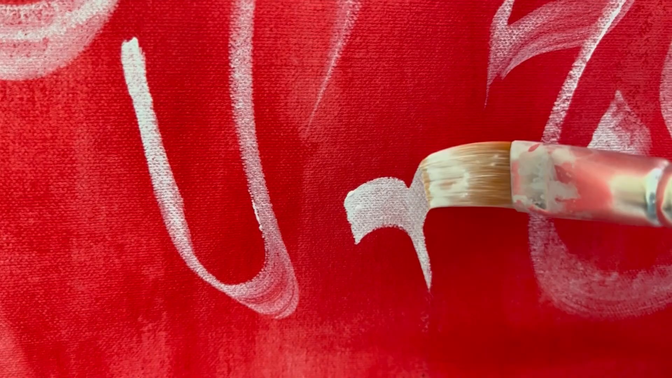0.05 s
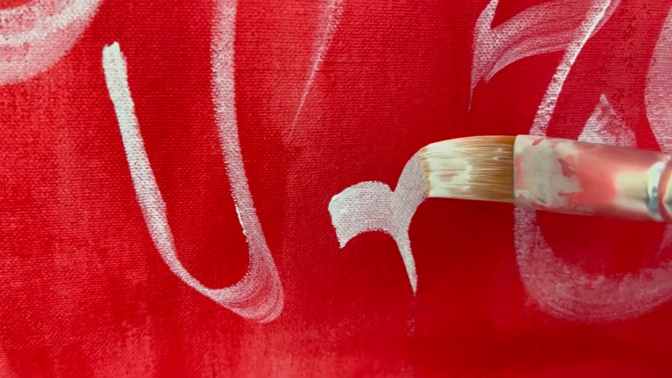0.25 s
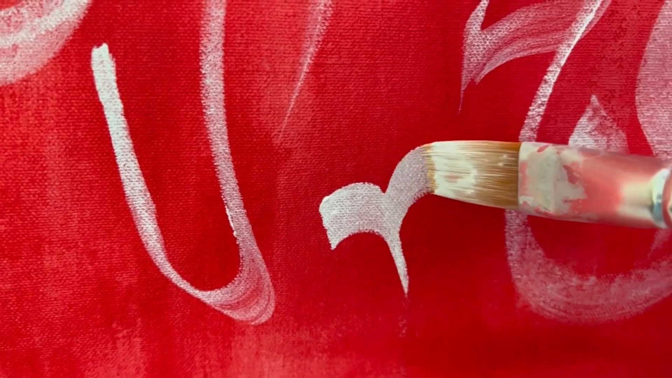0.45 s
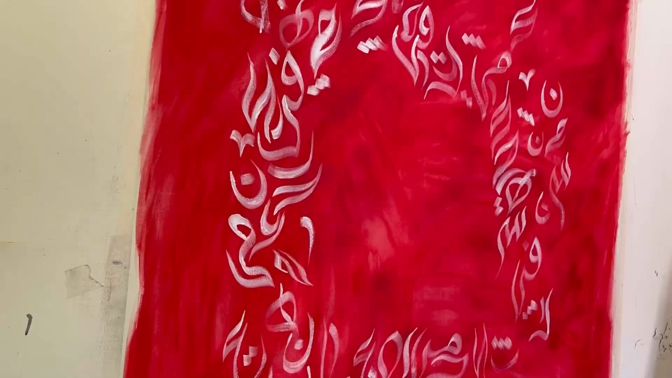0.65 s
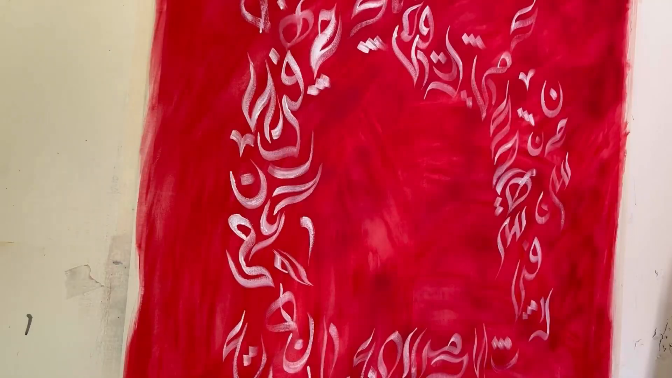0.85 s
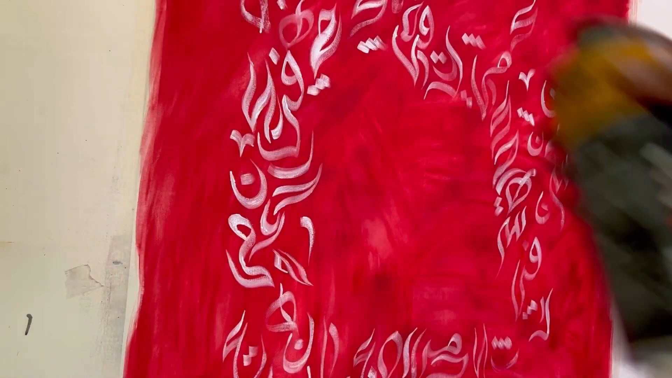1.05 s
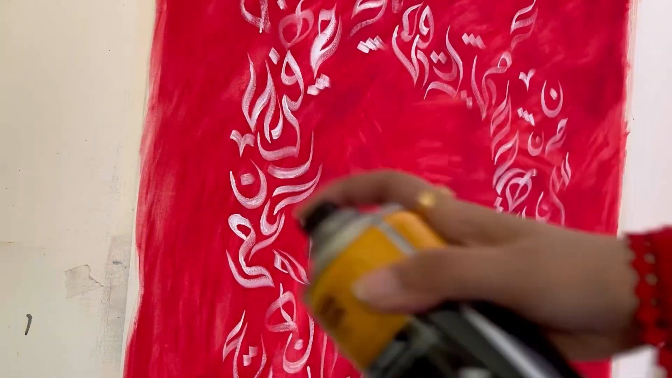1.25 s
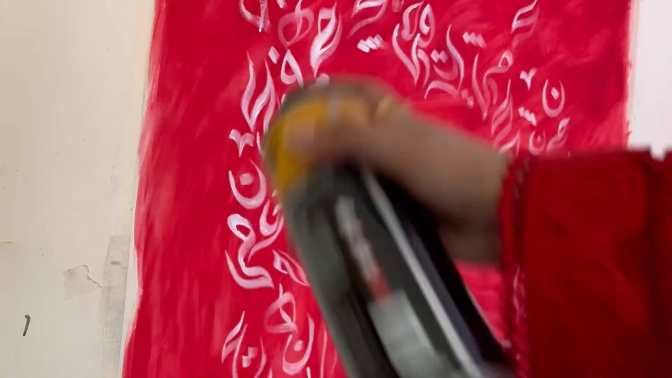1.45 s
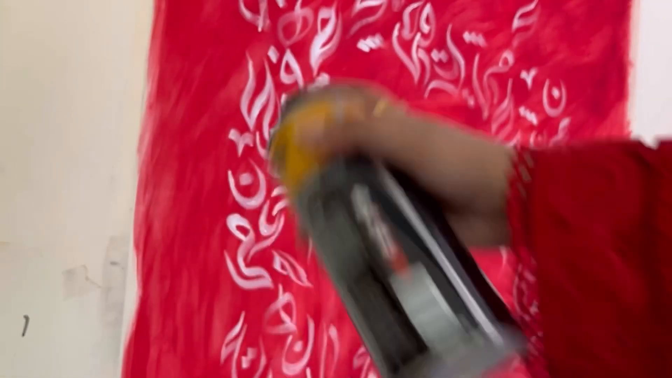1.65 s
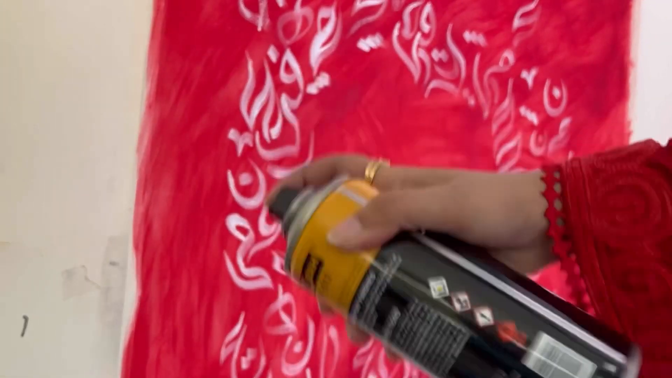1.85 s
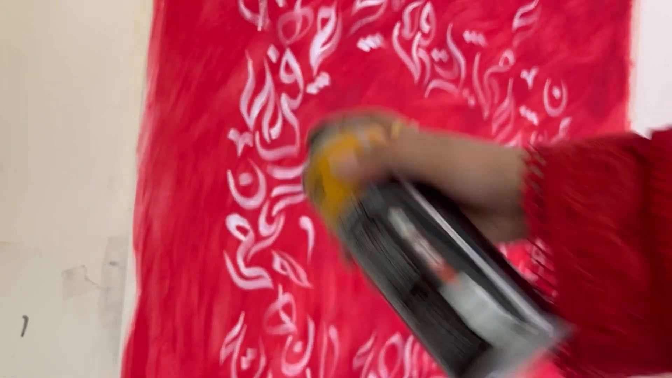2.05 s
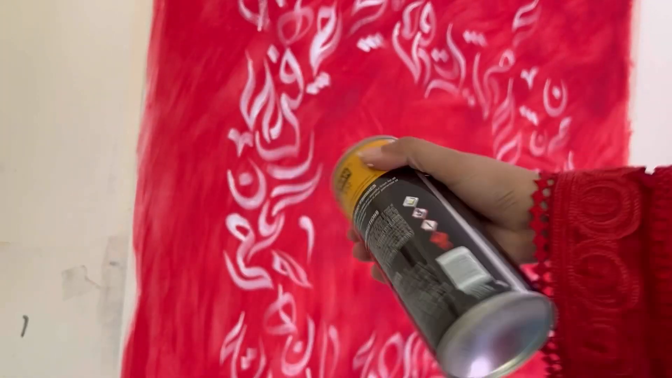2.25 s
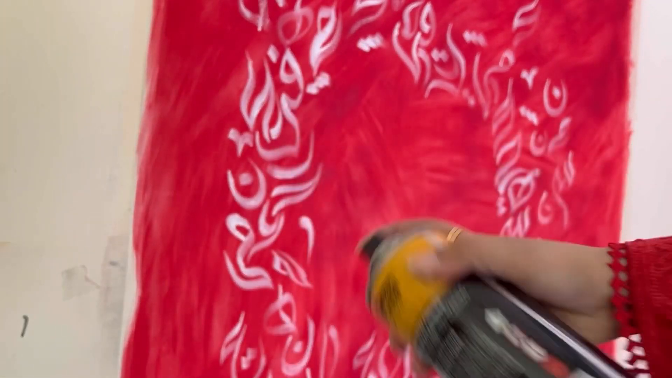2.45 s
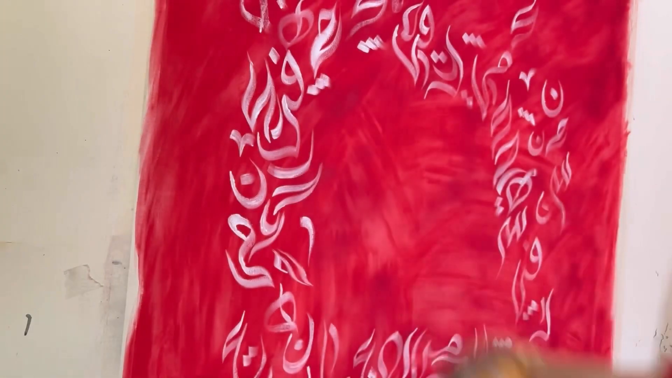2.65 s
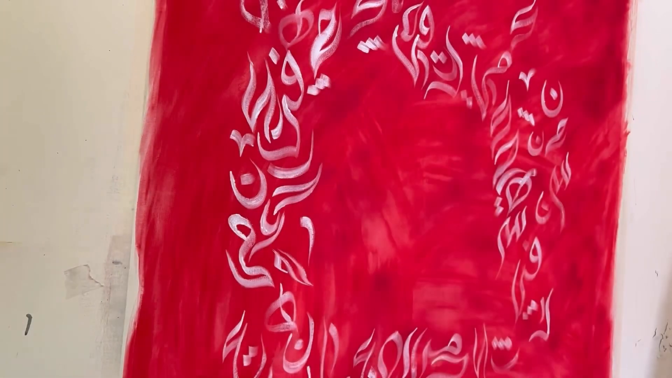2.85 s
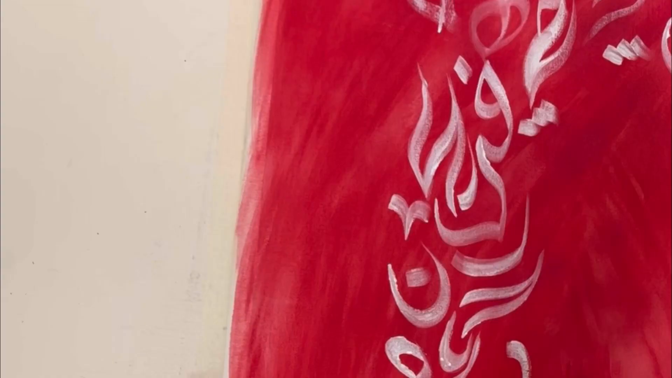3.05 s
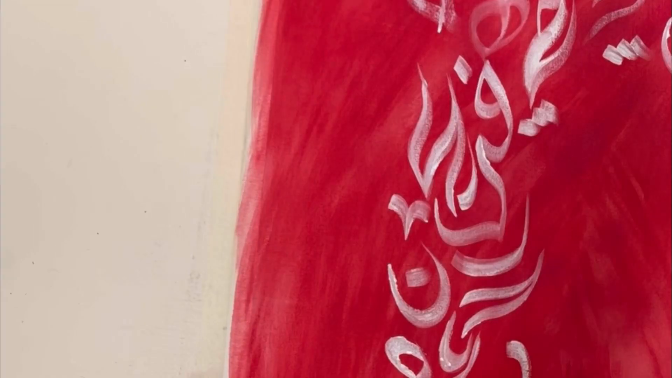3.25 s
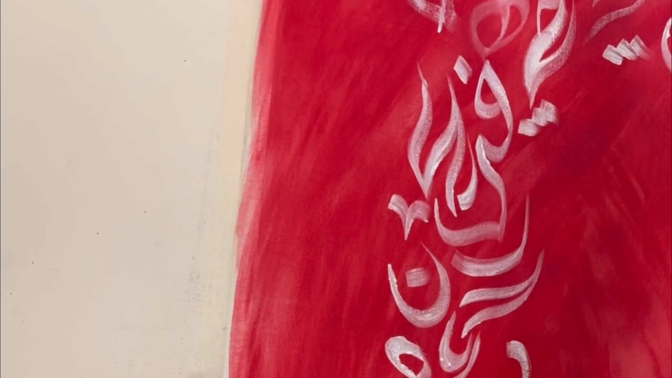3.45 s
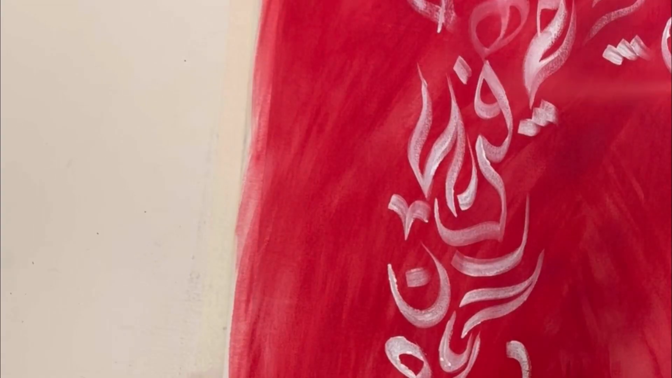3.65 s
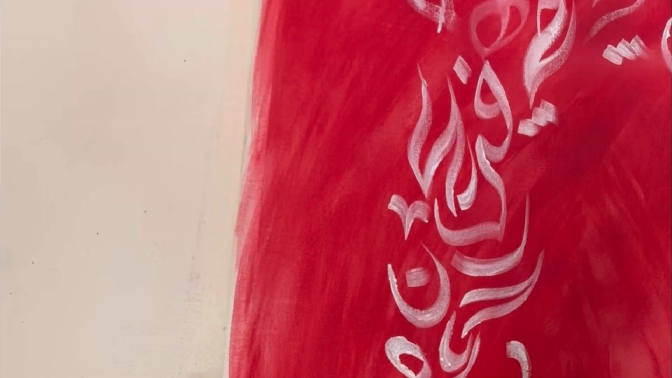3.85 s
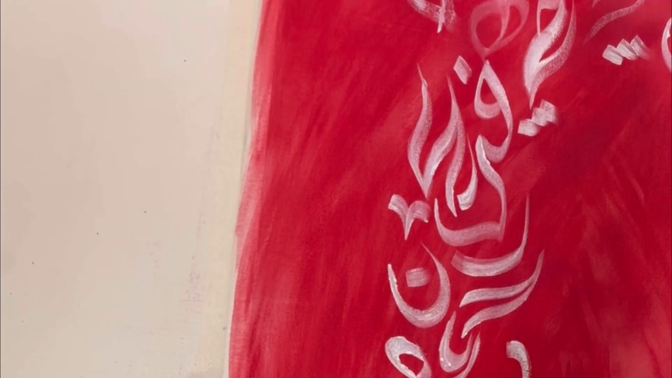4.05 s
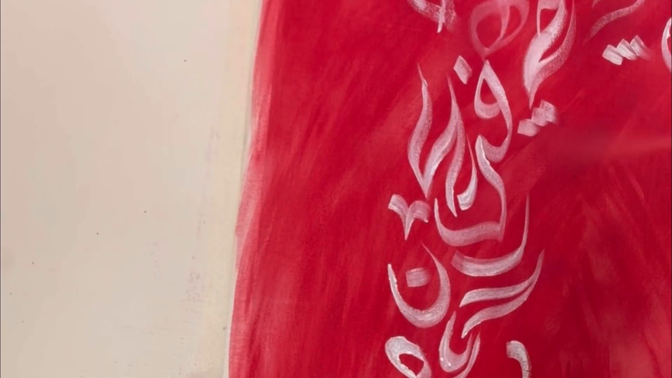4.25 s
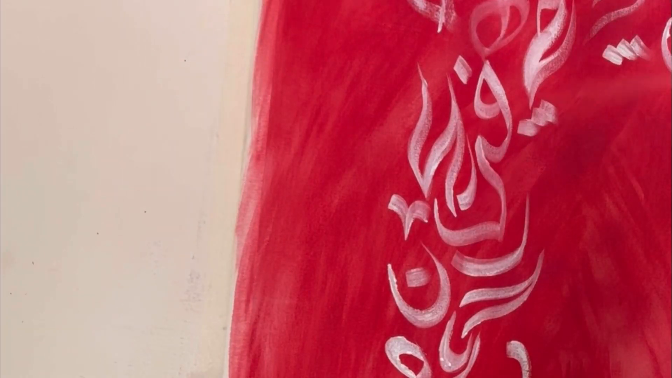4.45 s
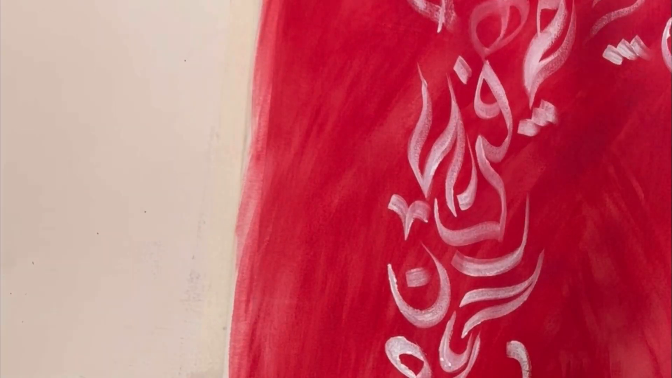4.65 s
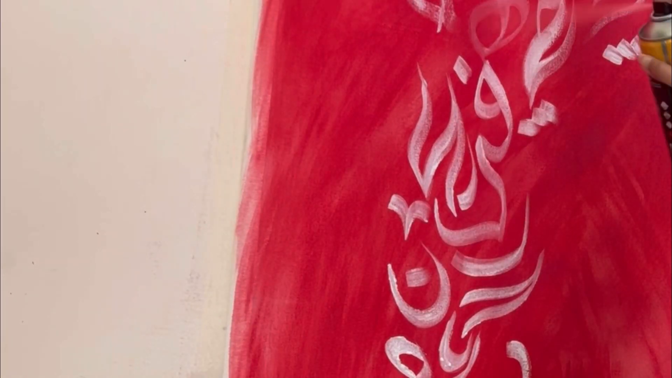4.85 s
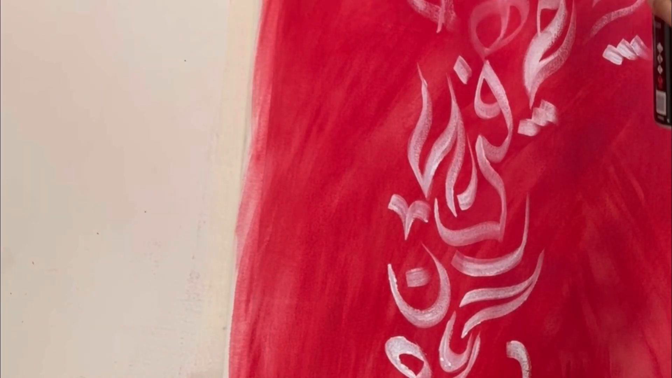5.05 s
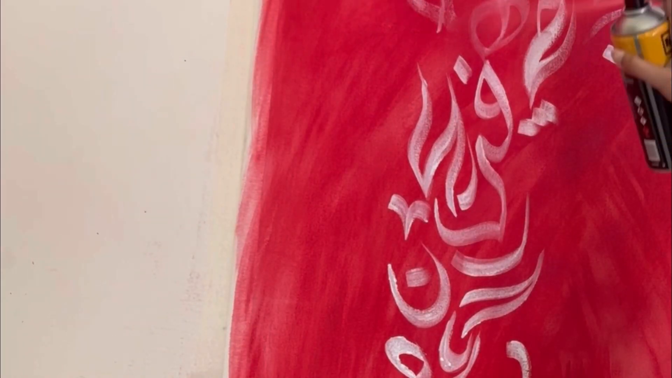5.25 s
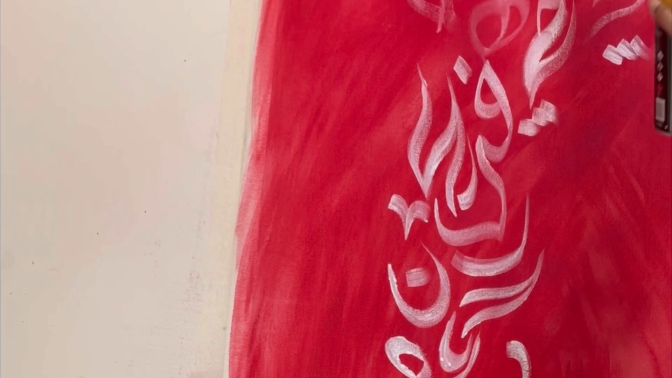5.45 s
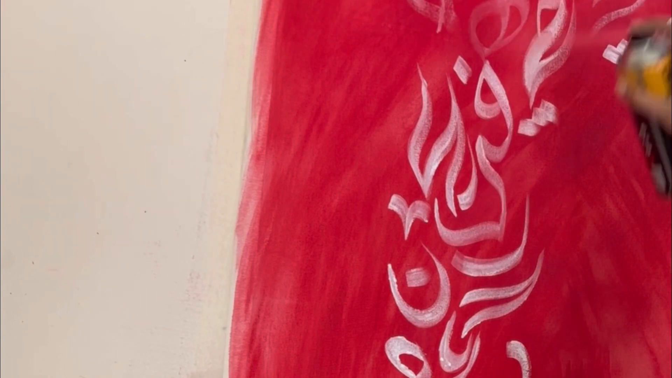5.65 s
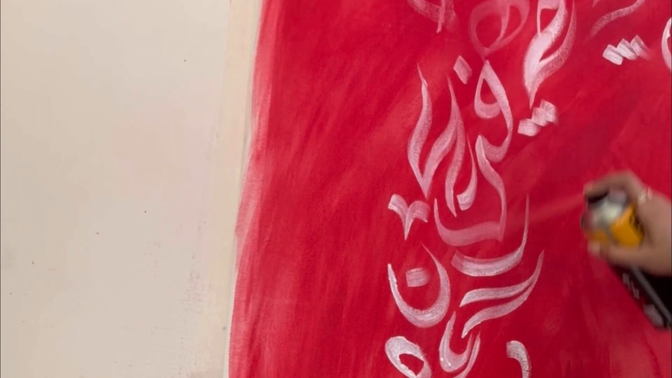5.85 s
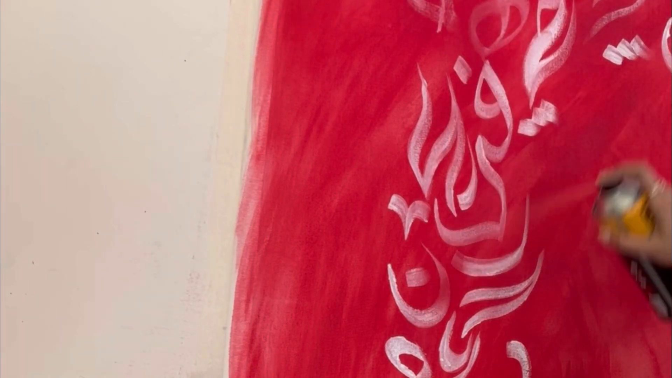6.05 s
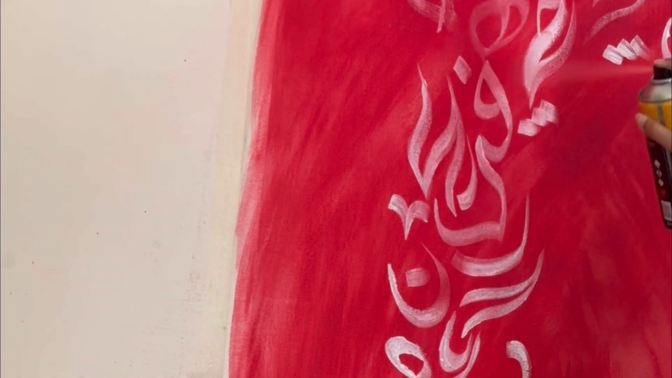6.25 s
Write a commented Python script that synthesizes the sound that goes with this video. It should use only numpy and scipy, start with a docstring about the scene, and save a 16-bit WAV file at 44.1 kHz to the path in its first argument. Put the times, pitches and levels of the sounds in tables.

```python
"""Shaking and spraying a paint can

After a quiet opening with a low rumble and a thin falling chirp, a spray can is shaken in a bare,
live room. Each impact of the steel ball excites the modes of the wall, damped by the paint inside.
Then a turbulent jet hisses steadily from the nozzle while the can sweeps over a canvas."""
import sys
import numpy as np
from scipy import signal
from scipy.fft import rfft, irfft, next_fast_len
from scipy.io import wavfile
from scipy.ndimage import uniform_filter1d

SR = 44100
rng = np.random.default_rng(int(sys.argv[2]) if len(sys.argv) > 2 else 0)


def output_pcm(signal):
    """Save a mono or channel-first signal as 16-bit PCM at the path in sys.argv[1].

    Samples are clipped to [-1, 1] before scaling.
    """
    pcm = np.clip(np.atleast_2d(signal).T, -1, 1) * 32767
    wavfile.write(sys.argv[1], SR, np.round(pcm).astype(np.int16))


N = 278271
FFT_SIZE = next_fast_len(N + SR)
TIME = np.arange(N) / SR

# ball impacts (time [s], thud, knock, lower wall, upper wall, tick, ping [each dB rms over 4 ms],
# lower wall pitch [Hz], upper wall pitch [Hz], contact time [ms])
IMPACTS = [(0.62, -81, -79, -74, -68, -67, -81, 2980, 4350, 1.1),
           (0.6324, -79, -61, -47.5, -52, -49.5, -61.5, 2870, 4270, 0.69),
           (1.1953, -72, -45.5, -39, -36.5, -54, -65.5, 3300, 3980, 0.57),
           (1.279, -67, -62, -50, -46, -48, -64, 3400, 4680, 0.75),
           (1.3039, -65, -61, -40, -35.0, -39, -40, 3450, 4280, 0.22),
           (1.3148, -41, -36, -23.5, -20.5, -26, -24, 3410, 4580, 1.26),
           (1.3318, -63, -38, -42, -44, -48, -41, 3480, 4280, 1.3),
           (1.3423, -56, -39, -35, -32.5, -49, -42, 3450, 4150, 1.4),
           (1.383, -56, -43, -43, -50, -54, -47, 3360, 4390, 1.1),
           (1.4106, -56, -44, -38, -55, -51.5, -53.0, 2840, 4530, 1.06),
           (1.4888, -72, -45, -43.5, -56, -58, -60, 3360, 4260, 1.6),
           (1.5969, -66, -53, -28, -26.5, -40.5, -43, 3370, 4500, 0.75),
           (1.6087, -35.5, -28.5, -13, -10, -22.5, -26, 3400, 4416, 0.53),
           (1.6213, -43, -53, -25, -33, -29, -36, 3500, 4450, 0.99),
           (1.6239, -55, -36, -16, -17.5, -39, -42, 3120, 4470, 0.34),
           (1.6354, -49, -37, -33, -42, -39, -40, 3330, 4450, 0.44),
           (1.642, -44, -40, -27, -39, -47, -47.0, 3400, 4340, 1.24),
           (1.6478, -28.5, -26.0, -12, -21, -33.5, -37, 3500, 4500, 0.99),
           (1.6639, -43, -48, -29, -45, -51.0, -45.5, 3400, 4270, 0.76),
           (1.767, -55, -40, -44.5, -40, -49.5, -47, 3400, 4370, 0.61),
           (1.7793, -44.5, -28, -26, -32, -35.5, -34, 3280, 4370, 0.82),
           (1.7852, -54, -52, -45, -25, -22.5, -17.5, 3340, 4350, 0.22),
           (1.8118, -40.5, -39, -19.5, -22.5, -26.5, -34.5, 3570, 4280, 0.34),
           (1.818, -60, -51, -37.5, -25, -48, -45.5, 3530, 4470, 1.1),
           (1.825, -38.5, -43, -13, -16.5, -29.5, -33, 3415, 3930, 0.23),
           (1.8767, -44, -27, -20, -41, -33, -36, 3140, 4070, 0.27),
           (1.897, -42, -26.5, -28, -20, -32, -37, 3340, 4350, 1.67),
           (1.9057, -49, -29.5, -18.5, -20, -32, -44, 3500, 4200, 0.52),
           (1.9495, -42.5, -30.5, -32, -20, -31.5, -33, 3500, 4330, 1.1),
           (1.9528, -39.5, -31, -20, -31, -34, -34, 3340, 4200, 0.7),
           (1.9844, -56, -51, -24, -36, -48, -53, 3400, 4170, 0.83),
           (2.0358, -39, -27.5, -22, -31, -34, -42, 3440, 3870, 0.54),
           (2.0389, -45, -42, -26, -44, -39, -41, 3320, 4340, 0.4),
           (2.073, -40.5, -27.5, -23.5, -31, -36.5, -44.5, 3670, 3760, 1.26),
           (2.094, -63, -59, -44, -31, -36, -38, 3550, 4500, 0.54),
           (2.1089, -43.5, -53, -36, -30, -24, -24, 3550, 4470, 0.52),
           (2.14, -70, -55.5, -33, -28.5, -50, -49, 3660, 4250, 0.31),
           (2.1516, -57, -41, -17.5, -16.5, -33.5, -38, 3380, 4080, 0.16),
           (2.1633, -63, -46, -34, -35, -48, -47, 3550, 4400, 0.27),
           (2.1762, -55, -52, -39, -46, -53, -51, 3400, 4300, 0.25),
           (2.1882, -43.5, -28, -17.5, -32, -29, -37, 3260, 4160, 0.15),
           (2.199, -58.5, -40, -42, -44, -44, -48.5, 3200, 4210, 0.31),
           (2.2311, -38.5, -45, -23.5, -24, -25, -36, 3630, 4390, 2.2),
           (2.235, -41, -26, -28, -20, -30, -31, 3780, 4230, 1.44),
           (2.251, -36.5, -25, -27.5, -28, -31.5, -42, 3070, 4530, 0.7),
           (2.271, -38.5, -47, -23.5, -25, -48.5, -42.5, 3630, 4370, 0.32),
           (2.3077, -39.5, -31, -23, -29, -41, -38, 3300, 4600, 0.82),
           (2.344, -54.5, -44.5, -44.5, -38, -41, -43.5, 3580, 4300, 0.73),
           (2.3558, -36.5, -28.5, -18, -21.5, -22.5, -25, 3570, 4500, 1),
           (2.375, -41.5, -34.5, -23.5, -26.5, -44.5, -48, 3560, 4120, 0.38),
           (2.4025, -54.5, -33, -30, -26.5, -31.5, -31, 3260, 4480, 1.4),
           (2.4396, -44, -27.5, -24, -26.5, -34, -40, 3150, 4300, 1.3),
           (2.492, -54.5, -46, -41, -41, -51.5, -54, 3380, 4150, 0.49),
           (2.5032, -43, -29.0, -22, -24.5, -29.5, -31.5, 3640, 4300, 0.64),
           (2.5088, -46, -34, -30, -24, -48, -46, 3450, 4450, 0.37),
           (2.5318, -43, -36, -32, -31, -32, -33, 3270, 4700, 1.96),
           (2.541, -47, -30, -29, -25.5, -47, -55, 3300, 4640, 0.41),
           (2.5984, -55.5, -52, -36, -43, -58.5, -44.5, 3440, 4480, 1),
           (2.6104, -44, -32.5, -18, -24, -34, -31, 3310, 4520, 1.2),
           (2.6199, -44.5, -47, -36.5, -42, -35.5, -40.5, 3360, 4330, 1.15),
           (2.63, -39, -29, -35.5, -27, -19, -18, 3300, 4550, 2.4),
           (2.6764, -56.5, -38.5, -30, -29, -32.5, -29.5, 3500, 4150, 0.91),
           (2.681, -53, -35.5, -22.5, -25, -38, -40.5, 3430, 4340, 1.1),
           (2.7443, -50, -36.5, -42, -37, -51, -49, 3400, 4400, 0.5),
           (2.7776, -54, -41, -36.5, -38, -34.5, -38.0, 3630, 4300, 1.5),
           (2.8001, -59, -42, -40, -46.5, -53, -57, 3500, 4160, 1.4),
           (2.8138, -62, -44.5, -40, -51, -42.5, -48, 3400, 4300, 1.7),
           (2.989, -70.5, -63, -54, -62, -65.5, -75.5, 3370, 4510, 2)]
# modes of the filled can in seven groups, thud to ping and then sparkle
# (frequency [Hz], level within the group [dB], t60 before a cap of 44 cycles [s])
CAN_MODES = [
    [(319, -16, 0.025), (413, -10, 0.0081), (758, 6.5, 0.0075), (990, -7, 0.0027)],
    [(1246, 0.5, 0.0057), (1732, 8.5, 0.0055), (2297, 7, 0.0084)],
    [(2950, 9.5, 0.001), (3170, 2.5, 0.0059), (3660, 5, 0.014)],
    [(4170, 1.5, 0.026), (4480, 11, 0.025)],
    [(5540, 12.5, 0.0032), (6770, 5, 0.0097), (7640, -14, 0.012), (7850, 5, 0.0079), (8810, 5, 0.012)],
    [(9170, -7.5, 0.0057), (9890, 11, 0.015), (10920, 9.5, 0.0077)],
    [(11900, 1, 0.0064), (14100, 0, 0.004), (13330, 10.5, 0.0023), (15700, 3.5, 0.0043)],
]
# share of an impact sent to the room as the can comes near and leaves (time [s], gain [dB])
ROOM_SEND = [(0.63, 22), (1.18, 9.5), (1.32, 9), (1.6, 8.5), (1.65, -1.5), (1.8, 8.5), (2.1, 4.5),
             (2.5, 7.5), (2.8, 9.5), (3.0, 23)]
# reflection from the canvas, left then right (delay [s], gain [dB])
CANVAS_ECHO = [(.0041, -13), (.0045, -13)]
# spraying (time [s], jet level [dB], mist level [dB], canvas drumming level [dB])
SPRAY_LEVELS = [(3.29, -75, -84.5, -82.5), (3.33, -48.5, -70.5, -68), (3.45, -42, -52.5, -58),
                (3.8, -40, -51, -58), (3.95, -41, -54, -59.5), (4.37, -39.5, -50.5, -57.5),
                (4.5, -41.5, -57.5, -65.5), (5.3, -41.5, -58, -64), (5.55, -40.5, -53.5, -72),
                (5.68, -42, -52, -66.5), (5.8, -40.5, -50, -56.5), (6.04, -41, -50, -56.5),
                (6.31, -41, -53.5, -60)]
# brief whistles of the nozzle (peak time [s], level [dB])
WHISTLE_PEAKS = [(3.775, -42), (5.65, -70), (5.81, -43.5)]
# ball and paint sliding (time [s], swish level [dB], whistle level [dB])
SLIDE_LEVELS = [(1.07, -99, -95), (1.108, -57, -69), (1.174, -54, -53), (1.2, -50, -39),
                (1.212, -59, -43.5), (1.29, -44.5, -49), (1.31, -57, -66)]
# wall resonances under the rolling ball (frequency [Hz], relative level [dB], t60 [s])
SCRAPE_MODES = [(2200, -5.5, 0.0032), (3400, 0.5, 0.0044), (4300, -2, 0.0063)]
# tones left hanging by the chirp (start [s], frequency [Hz], level [dB])
LINGERING_TONES = [(0.0, 8374, -64), (0.05, 6480, -70), (0.08, 5500, -71)]

# envelopes (time [s], level [dB])
SCRAPE_LEVEL = [(1.76, -62), (1.82, -48.5), (2.7, -50), (2.85, -61)]  # ball rolling between impacts
RUMBLE_LEVEL = [(0.56, -63.5), (0.72, -76.5), (1.28, -72), (1.33, -61), (1.5, -66.5), (1.85, -60.5),
                (2.05, -65), (2.26, -60.5), (2.66, -58), (3.0, -68), (3.9, -62), (4.05, -63.5), (4.37, -59),
                (4.45, -68.5), (5.7, -69.5), (5.95, -63), (6.31, -62.5)]  # rumble of the room
AIR_LEVEL = [(.54, -101), (.56, -63), (.75, -61), (.95, -72), (.965, -63.5), (1.08, -67.5), (1.3, -48),
             (2.8, -54.5), (3.1, -61.5), (3.11, -70), (3.17, -61), (3.2, -56.5), (3.29, -64), (3.6, -66)]  # faint rustle and air of the room
OPENING_AIR_LEVEL = [(0, -71), (.3, -77), (.55, -78), (.56, -95)]  # air of the quiet opening
SHIMMER_LEVEL = [(0.0, -58), (0.13, -67), (0.3, -78), (0.46, -92), (0.5, -66), (0.546, -64), (0.56, -89)]  # thin treble around the chirp

# noise spectra (frequency [Hz], relative spectral density [dB])
HISS_SPECTRUM = [(3350, -52), (5700, -48), (5950, -17), (8710, -10.5), (13100, -5), (15100, -9.5),
                 (15700, -2)]  # upper band of the jet
ROAR_SPECTRUM = [(1800, -50), (2400, -10), (3000, 2.5), (4000, 3), (5300, 6.5), (5900, -9.5), (7000, -62)]  # lower band of the jet
MIST_SPECTRUM = [(700, 5), (950, 4), (1400, 8.5), (2300, 8), (3000, 8), (4000, -40)]  # mist landing
DRUMMING_SPECTRUM = [(150, -31), (260, -8.5), (500, 2), (750, 3), (950, -2), (1300, 3.5)]  # canvas under the mist
WHISTLE_SPECTRUM = [(7000, -7), (7800, -19), (8500, -6), (9000, -4), (9300, -32)]  # whistle of nozzle and sliding
SWISH_SPECTRUM = [(470, -66.5), (800, -18), (1210, -41), (1690, -1), (4690, 1), (5380, -6), (10000, -4),
                  (15700, -13)]  # ball and paint sliding
ROOM_SPECTRUM = [(200, -31.5), (1400, -18), (3700, -24.5), (6000, -20.5), (10000, -17.5), (15000, -19.5),
                 (15900, -13.5)]  # reverberation
BUMPS_SPECTRUM = [(22, -9), (50, -24), (130, 2), (185, -6), (250, -1), (380, -17.5), (750, -25.5)]  # low bumps of the opening
RUMBLE_SPECTRUM = [(13, -36.5), (22, -3.5), (32, -17.5), (43, -18), (54, -21.5), (97, 1.5), (210, -5),
                   (330, -3.5), (430, -4.5), (730, -120)]
AIR_SPECTRUM = [(350, -11), (600, -2.5), (1200, -5), (2500, -5.5), (3400, 2), (5000, -6.5), (11000, -4.5),
                (15700, -6.5)]
OPENING_AIR_SPECTRUM = [(450, -15), (700, -3), (1500, -4.5), (3500, -3), (8000, -10.5), (13500, -21),
                        (14500, -45)]
SHIMMER_SPECTRUM = [(5300, -16), (7000, -18), (8500, 0), (11500, 5), (12000, -23)]

# reverberation time (frequency [Hz], t60 [s])
ROOM_T60 = [(200, 0.21), (1400, 0.47), (3700, 0.43), (9700, 0.43), (15000, 0.48)]
# likeness of the two channels in diffuse sound (frequency [Hz], coherence [0 to 1])
COHERENCE = [(30, 1), (130, 0.91), (290, 0.79), (640, 0.66), (1400, 0.12), (3100, 0.23), (6800, 0.017)]
# balance of diffuse sound (frequency [Hz], left minus right [dB])
BALANCE = [(60, 0.5), (240, 0.5), (950, 0), (3770, 0.5), (15000, 4.5)]

CONTACT_SAMPLES, KNOCK_SAMPLES = 512, 1024
WALL_TOP_HZ = 5000  # modes above the wall's own start more slowly and shift more


def ball_knocks():
    """Modal superposition: each impact sums the can's modes. Returns near sound and room feed."""
    times, groups_db, tunings, contact_s = impact_settings()
    level_window = .004 * SR
    knocks, power = 0, 0
    for modes, group_db, tuning in zip(CAN_MODES, groups_db, tunings):
        group, group_power = mode_group(modes, tuning, contact_s)
        if modes is CAN_MODES[0]:
            group = group + paint_thud(contact_s)
        mean_square = np.sum(group.mean(axis=0) ** 2, axis=1) / level_window
        knocks = knocks + group * (from_db(group_db) / np.sqrt(mean_square))[:, None]
        power_gain = from_db(2 * group_db) * level_window / group_power.mean(axis=1)
        power = power + group_power * power_gain[:, None]
    # the room receives all directions at once: the smoothed sum of the modes' power
    all_round = np.roll(irfft(np.sqrt(uniform_filter1d(power, size=9))), 128, axis=1)
    send_db = np.interp(times, *np.transpose(ROOM_SEND))
    starts = np.round((times - .0001) * SR).astype(int)  # contact begins 0.1 ms early
    tracks = np.zeros((3, N))  # left, right, room feed
    for k, start in enumerate(starts):
        tracks[:2, start:start + KNOCK_SAMPLES] += knocks[:, k]
        tracks[2, start:start + KNOCK_SAMPLES] += all_round[k] * from_db(send_db[k])
    bass_cut = signal.butter(3, 150, "high", fs=SR, output="sos")  # a small can radiates little bass
    *direct, to_room = signal.sosfilt(bass_cut, tracks)
    near = [x + from_db(db) * np.roll(x, round(lag * SR)) for x, (lag, db) in zip(direct, CANVAS_ECHO)]
    return np.array(near), to_room


def impact_settings(dulling_db_per_s=10):
    """Paint loading: each impact has its own tuning, and stirred paint dulls the highest modes."""
    times, *groups_db, lower_hz, upper_hz, contact_ms = np.transpose(IMPACTS)
    sparkle_db = groups_db[-1] - 0.5 - dulling_db_per_s * (times - times.mean())
    tunings = np.ones((len(CAN_MODES), len(times), 1))
    for wall, hz in ((2, lower_hz), (3, upper_hz)):
        mode_hz, mode_db, t60 = np.transpose(CAN_MODES[wall])
        tunings[wall, :, 0] = hz / np.average(mode_hz, weights=from_db(2 * mode_db) * t60)
    return times, groups_db + [sparkle_db], tunings, contact_ms[:, None] / 1000


def mode_group(modes, tuning, contact_s, build_cycles=1.1, swell_cycles=2.1):
    """Forced vibration: a short rough contact drives damped modes. Returns sound and power spectra."""
    t = np.arange(CONTACT_SAMPLES) / SR
    sound, power = 0, 0
    for hz, db, t60 in modes:
        cushion_s, detune = (.0005, .035) if hz > WALL_TOP_HZ else (0, .012)
        rise = t / (contact_s + cushion_s + build_cycles / hz)  # low modes build up later
        pulse = (rise * np.exp(-rise)) ** 3
        common, side = rng.standard_normal((2, len(tuning), CONTACT_SAMPLES)) * pulse
        drive = common + from_db(-9) * side * [[[1]], [[-1]]]  # the wall radiates unequally to each side
        pitch = hz * tuning * (1 + detune * rng.standard_normal((len(tuning), 1)))  # the paint shifts
        swell = 1 - np.exp(-t * hz / swell_cycles)  # the paint softens the onset
        decay = from_db(db - 60 * t / min(t60, 44 / hz))
        response = rfft(np.sin(2 * np.pi * pitch * t) * swell * decay, KNOCK_SAMPLES)
        sound = sound + irfft(rfft(drive, KNOCK_SAMPLES) * response)
        power = power + np.abs(response) ** 2
    return sound, power


def paint_thud(contact_s, from_hz=1750, to_hz=218, fall_s=0.00223, peak_s=0.0015):
    """Dispersion: the shock runs down the paint, highs first, as a short falling tone."""
    age = np.maximum(np.arange(KNOCK_SAMPLES) / SR - contact_s, 0)
    cycles = to_hz * age + (from_hz - to_hz) * fall_s * (1 - np.exp(-age / fall_s))
    envelope = from_db(43) * age / peak_s * np.exp(-age / peak_s)
    return envelope * np.sin(2 * np.pi * cycles)


def spray():
    """Turbulence and droplet impact: the jet hisses and roars while its mist drums on the canvas."""
    hiss_db, mist_db, drumming_db = envelopes(SPRAY_LEVELS)
    usual_mist_db = np.median(mist_db[TIME > SPRAY_LEVELS[2][0]])
    roar_db = hiss_db - 5 + 0.2 * np.clip(mist_db - usual_mist_db, -10, 10)
    puff = from_db(-55) * np.exp(-((TIME - 4.37) / 0.02) ** 2)  # one low puff on the canvas
    hiss = from_db(hiss_db) * noise(HISS_SPECTRUM, 1.3, 30, bands=14)
    roar = from_db(roar_db) * noise(ROAR_SPECTRUM, 1.3, 30, bands=8)
    mist = from_db(mist_db) * noise(MIST_SPECTRUM, 1.5, 25, bands=8)
    drumming = (from_db(drumming_db) + puff) * noise(DRUMMING_SPECTRUM, 0.99, 14, bands=3)
    return coarse_grain(hiss + roar + mist + drumming) + nozzle_whistle()


def nozzle_whistle(rise_db_per_s=167, fall_db_per_s=121, rest_db=-87):
    """Narrow-band flow noise: a faint whistle grows and decays exponentially around each peak."""
    level = from_db(rest_db) * (TIME > SPRAY_LEVELS[1][0])
    for peak_s, db in WHISTLE_PEAKS:
        age = TIME - peak_s
        level += from_db(db + np.minimum(rise_db_per_s * age, -fall_db_per_s * age))
    return level * noise(WHISTLE_SPECTRUM, 0.71, 27)


def ball_slide():
    """Sliding friction: ball and paint swish along the wall with a thin whistle."""
    swish_db, whistle_db = envelopes(SLIDE_LEVELS)
    whistle = from_db(whistle_db) * noise(WHISTLE_SPECTRUM, 1.5, 70)
    return from_db(swish_db) * coarse_grain(noise(SWISH_SPECTRUM, 5.4, 59.4, bands=8)) + whistle


def ball_scrape(median_touches_per_s=250, spread_db=5):
    """Rolling contact: small uneven touches come in clumps, each exciting one wall resonance."""
    sizes = from_db(spread_db * np.minimum(rng.exponential(1, N), 4)) * rng.choice([-1, 1], N)
    touches = sizes * (rng.random(N) < median_touches_per_s * from_db(5 * drift(60)) / SR)
    struck_mode = rng.integers(0, len(SCRAPE_MODES), N)
    sound = 0
    for k, (hz, db, t60) in enumerate(SCRAPE_MODES):
        radius, angle = from_db(-60 / (t60 * SR)), 2 * np.pi * hz / SR
        poles = [1, -2 * radius * np.cos(angle), radius * radius]
        ring = signal.lfilter([np.sin(angle)], poles, touches * (struck_mode == k) + 1e-18)
        softened = signal.lfilter([1, 0, -1], poles, ring)  # a second pass rounds the onset
        sound = sound + from_db(db) * unit_rms(softened)
    return from_db(envelopes(SCRAPE_LEVEL)[0]) * unit_rms(sound)


def chirp(from_hz=8500, to_hz=5500, fall_s=0.035, fade_db_per_s=160):
    """Frequency modulation: a slightly rough tone glides down to its lowest pitch and fades."""
    glide_hz = to_hz + (from_hz - to_hz) * np.exp(-TIME / fall_s)
    level_db = -61 - fade_db_per_s * TIME + 6.2 * drift(30)
    rough_hz = glide_hz * (1 + 0.027 * drift(110))
    return from_db(level_db) * np.sin(2 * np.pi * np.cumsum(rough_hz) / SR)


def lingering_tones(rise_s=0.012, fade_db_per_s=47, half_width_hz=140):
    """Exponential decay: narrow noise bands hang on after the chirp as breathy, wavering tones."""
    sound = 0
    for start, hz, db in LINGERING_TONES:
        age = TIME - start
        level = np.clip(age / rise_s, 0, 1) * from_db(db - fade_db_per_s * age)
        spectrum = [(hz - half_width_hz, -10), (hz, 0), (hz + half_width_hz, -10)]
        sound = sound + level * noise(spectrum, 1.7, 30)
    return sound


def reverberation(x, build_s=0.0014):
    """Diffuse reflection: the room's response builds up, then decays at each band's own rate."""
    t = np.arange(SR) / SR
    parts = diffuse_bands(ROOM_SPECTRUM, 8)
    tail = sum(band[:, :SR] * from_db(-60 * t / at_hz(ROOM_T60, hz)) for hz, band in parts)
    response = tail * (1 - np.exp(-(t / build_s) ** 2)) * from_db(-23.5)
    return irfft(rfft(x, FFT_SIZE) * rfft(response, FFT_SIZE), FFT_SIZE)[:, :N]


def background(opening_s=0.548):
    """Ambient noise: low bumps, faint air and shimmer give way to the room's rumble and rustle."""
    bumps = from_db(-61) * (TIME < opening_s) * noise(BUMPS_SPECTRUM, 3.5, 21.7, bands=3)
    rumble = from_db(envelopes(RUMBLE_LEVEL)[0]) * noise(RUMBLE_SPECTRUM, 3.2, 25, bands=5)
    air = from_db(envelopes(AIR_LEVEL)[0]) * coarse_grain(noise(AIR_SPECTRUM, 0.7, 21))
    faint_air = from_db(envelopes(OPENING_AIR_LEVEL)[0]) * noise(OPENING_AIR_SPECTRUM, 2.5, 28.2, bands=4)
    shimmer = from_db(envelopes(SHIMMER_LEVEL)[0]) * noise(SHIMMER_SPECTRUM, 2.5, 30)
    return bumps + rumble + air + faint_air + shimmer


def coarse_grain(x, spread_db=5.4):
    """Bubbly, watery grain: each narrow band takes a new random strength about 57 times a second."""
    cells = signal.stft(x, nperseg=1536)[2]
    gains = from_db(spread_db * rng.standard_normal(cells.shape[1:]))
    rough = signal.istft(cells * gains, nperseg=1536)[1][:, :N]
    return rough * np.std(x) / np.std(rough)


def noise(spectrum, flicker_db, flicker_hz, bands=2):
    """Amplitude modulation: stereo noise of unit rms whose bands flicker partly in step."""
    common = 0.35 * drift(flicker_hz)
    return unit_rms(sum(band[:, :N] * from_db(flicker_db * (common + drift(flicker_hz)))
                        for _, band in diffuse_bands(spectrum, bands)))


def diffuse_bands(spectrum, count):
    """Diffuse field, coherent only in the bass: yields (centre [Hz], stereo noise) band by band."""
    hz = np.maximum(np.arange(FFT_SIZE // 2 + 1) * SR / FFT_SIZE, 1)
    mid, side = rfft(rng.standard_normal((2, FFT_SIZE)))
    coherence = np.clip(at_hz(COHERENCE, hz), 0, 1)
    inside = (hz >= spectrum[0][0]) & (hz <= spectrum[-1][0])
    balance = from_db(at_hz(BALANCE, hz) * [[.5], [-.5]])
    pair = np.sqrt(1 + coherence) * mid + np.sqrt(1 - coherence) * side * [[1], [-1]]
    coloured = pair * balance * inside * from_db(at_hz(spectrum, hz))
    low_hz, high_hz = hz[inside][[0, -1]]
    position = np.log(hz / low_hz) / np.log(high_hz / low_hz) * (count - 1)
    for k in range(count):
        triangle = np.clip(1 - np.abs(position - k), 0, 1)
        yield hz[np.argmax(position >= k - 1e-9)], irfft(coloured * triangle, FFT_SIZE)


def drift(rate_hz):
    """Random fluctuation with a spread of about 1."""
    return np.interp(TIME * rate_hz, np.arange(800), rng.standard_normal(800))


def envelopes(rows):
    """Linear interpolation of each level column [dB] per sample; inaudible outside the table."""
    times, *columns = np.transpose(rows)
    return [np.interp(TIME, times, db, left=-150, right=-150) for db in columns]


def at_hz(points, hz):
    """Interpolation on a logarithmic frequency axis."""
    frequencies, values = np.transpose(points)
    return np.interp(np.log(hz), np.log(frequencies), values)


def from_db(db):
    """Amplitude ratio of a level in decibels."""
    return 10 ** (np.asarray(db) / 20)


def unit_rms(x):
    """Normalisation to unit mean power."""
    return x / np.sqrt(np.mean(x ** 2) + 1e-20)


def scene(echo_ends_s=3.105):
    """Superposition of direct and reverberant sound; the echo stops short before the spraying."""
    knocks, to_room = ball_knocks()
    far_chirp = chirp()
    direct = knocks + from_db(-8) * far_chirp + lingering_tones()
    echo = reverberation(to_room + from_db(19) * far_chirp) * (TIME < echo_ends_s)
    return direct + echo + ball_slide() + ball_scrape() + spray() + background()


def record(dry, treble_edge_hz=15907.5, cutoff_hz=16785):
    """Saturation and band limiting: peaks are rounded and the treble falls away steeply near 16 kHz."""
    rounded = 1.127 * np.tanh(dry / 1.233)
    heard = signal.sosfilt(signal.cheby2(14, 22, treble_edge_hz, fs=SR, output="sos"), rounded)
    return signal.sosfilt(signal.cheby2(12, 60, cutoff_hz, fs=SR, output="sos"), heard)


dry = scene()
out = record(dry)
output_pcm(out)
```